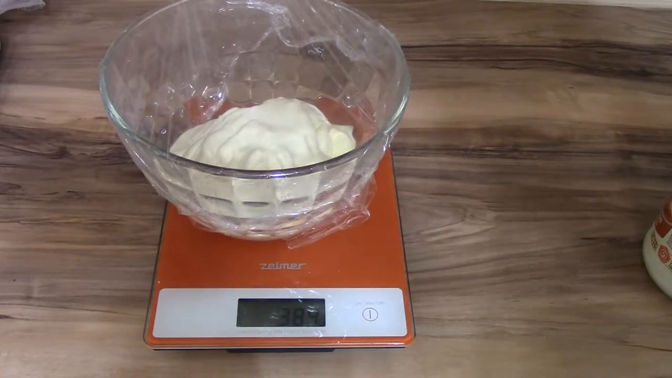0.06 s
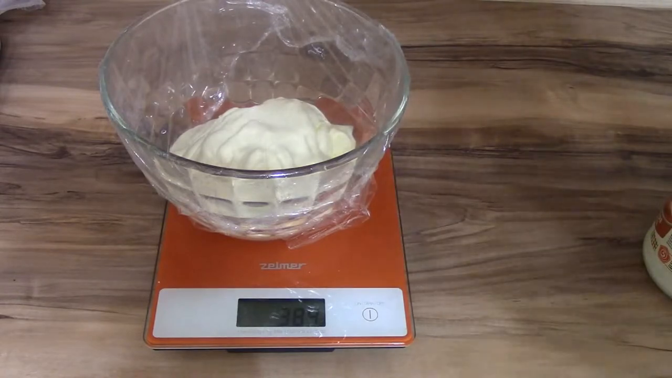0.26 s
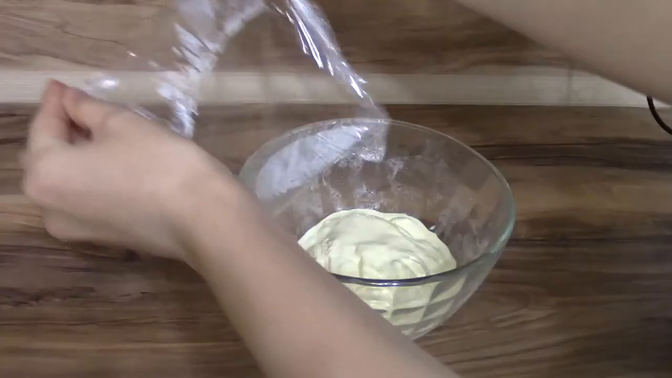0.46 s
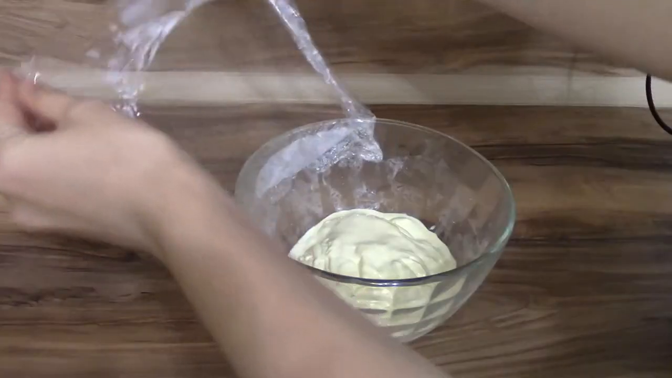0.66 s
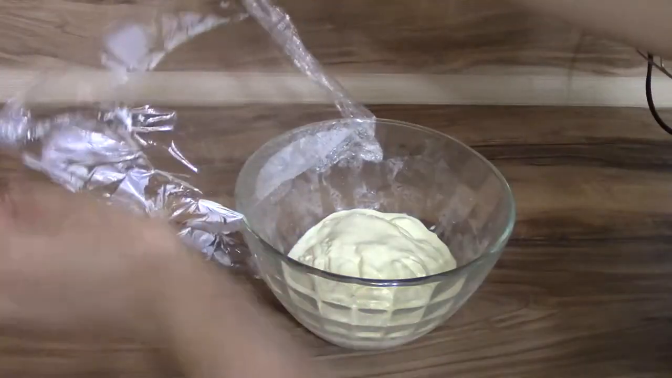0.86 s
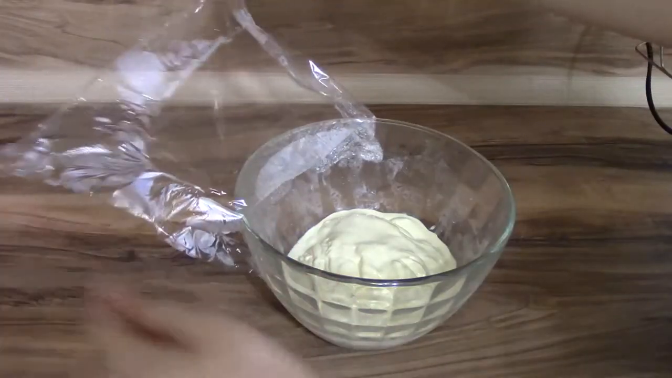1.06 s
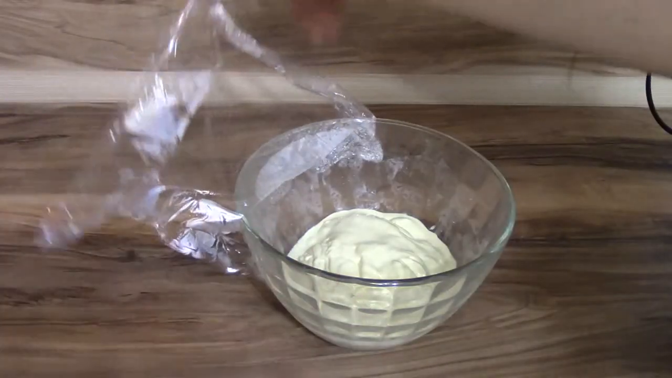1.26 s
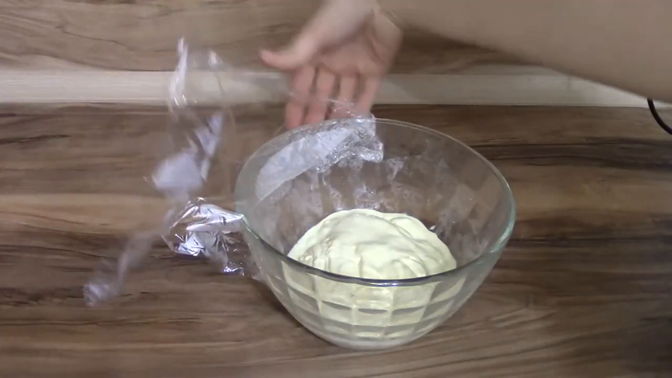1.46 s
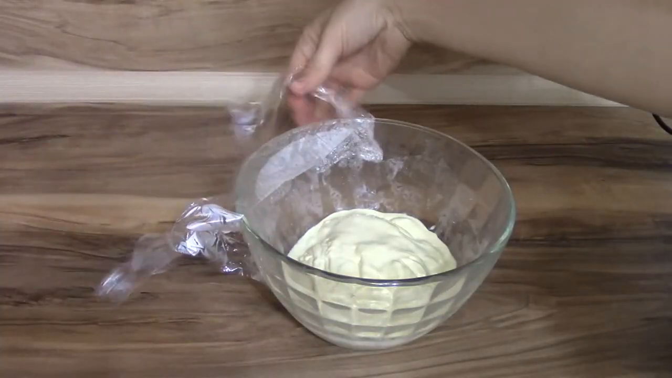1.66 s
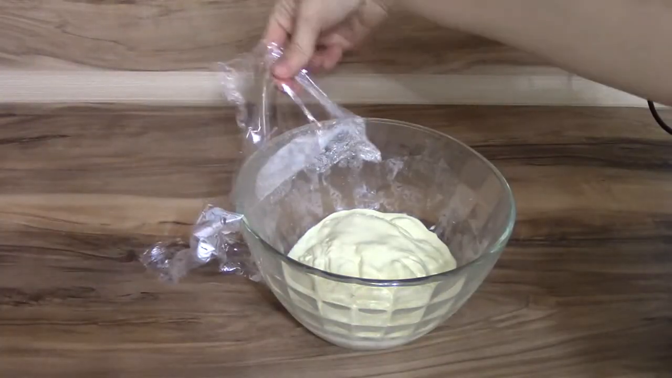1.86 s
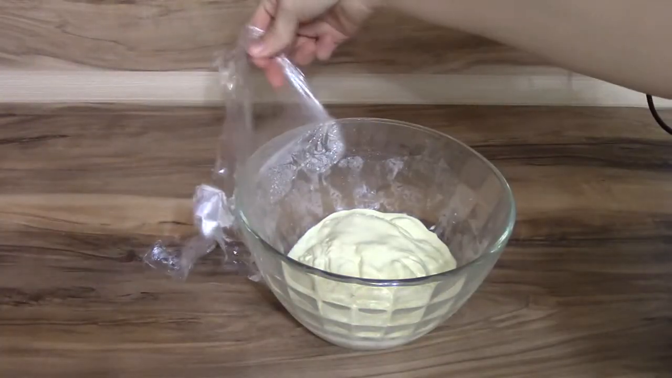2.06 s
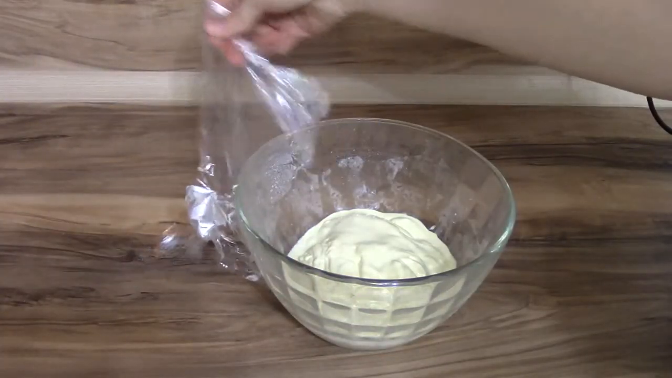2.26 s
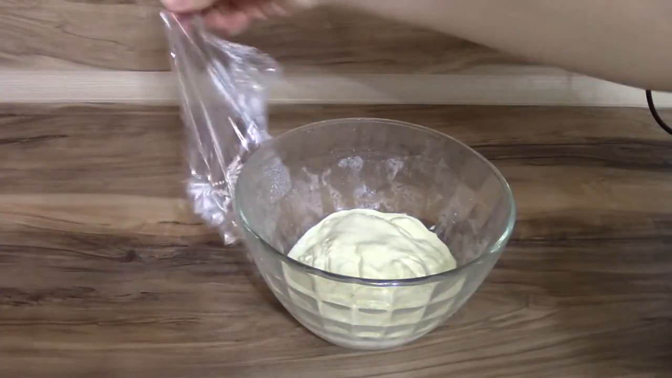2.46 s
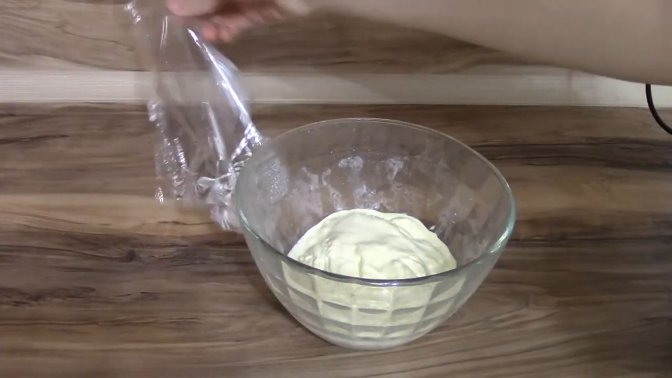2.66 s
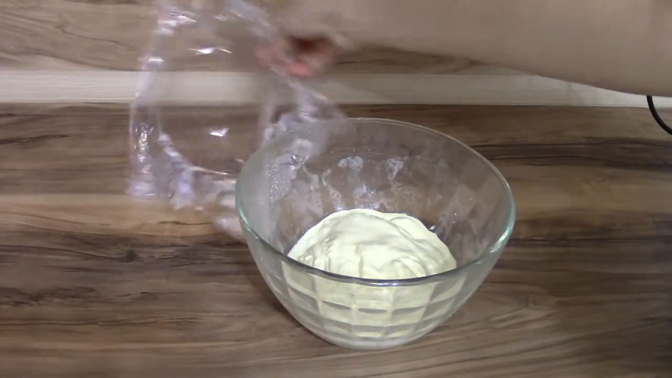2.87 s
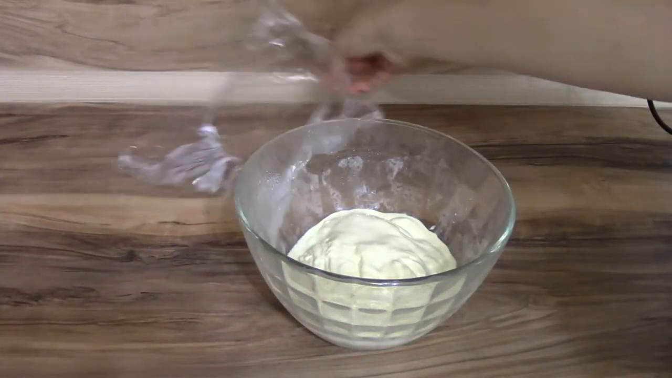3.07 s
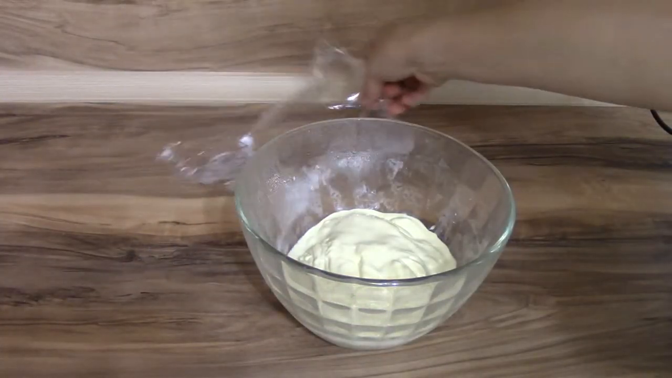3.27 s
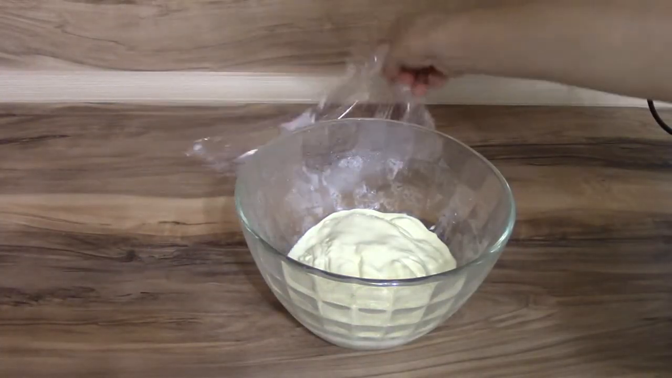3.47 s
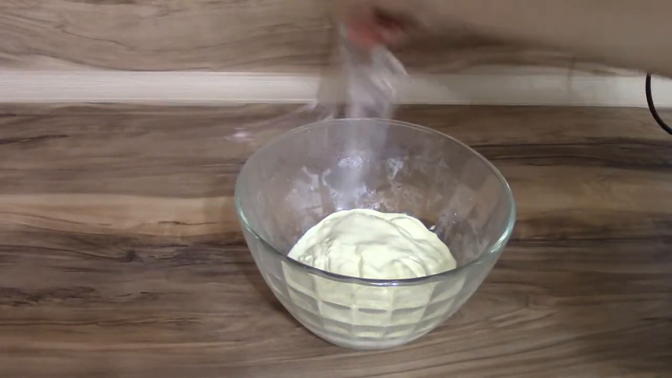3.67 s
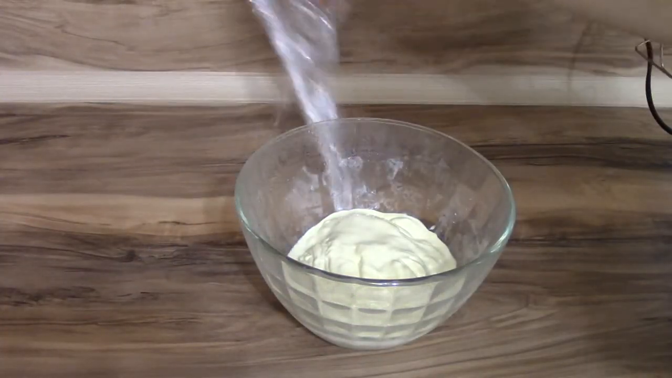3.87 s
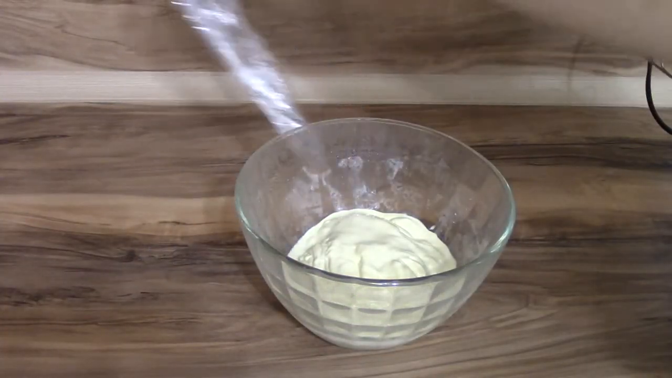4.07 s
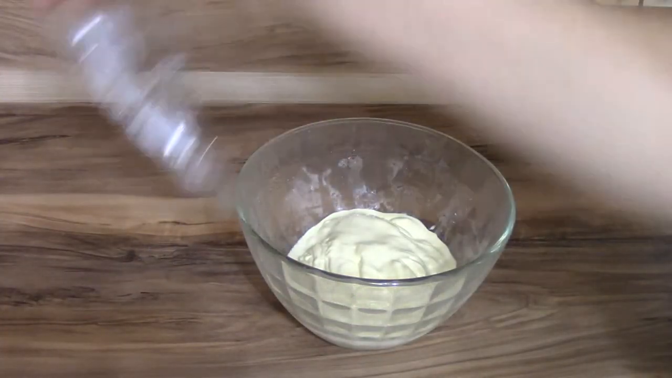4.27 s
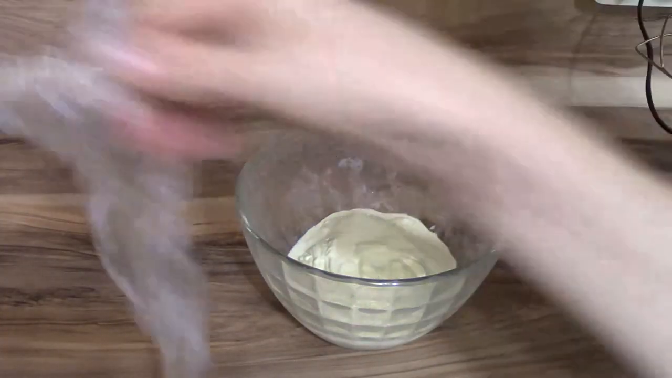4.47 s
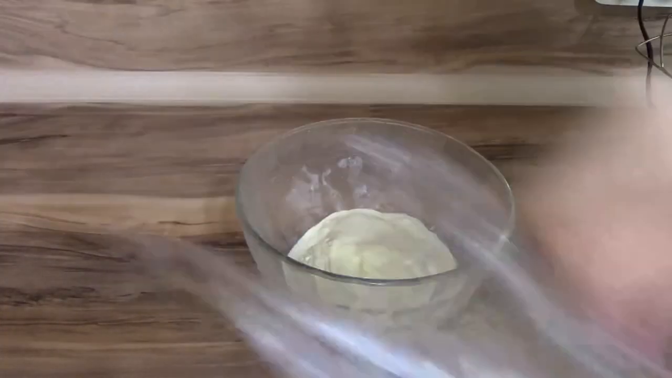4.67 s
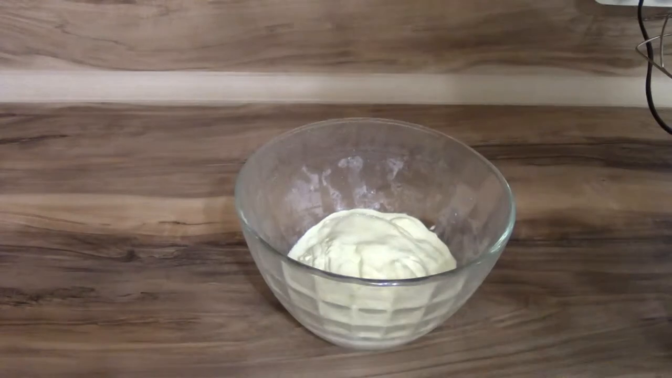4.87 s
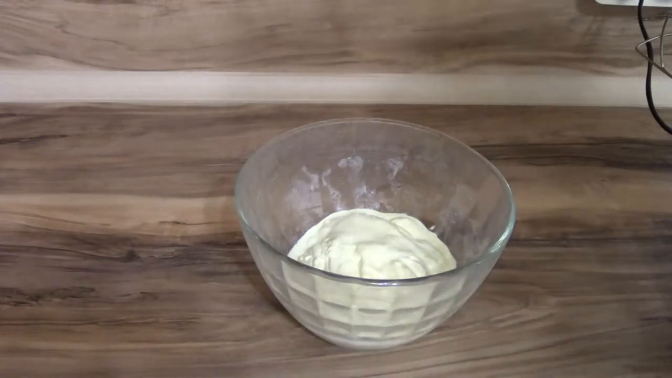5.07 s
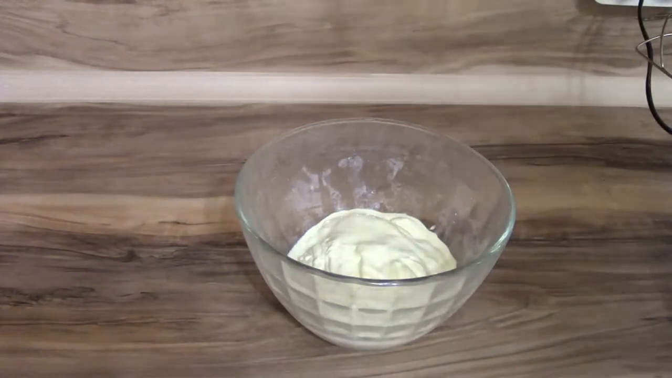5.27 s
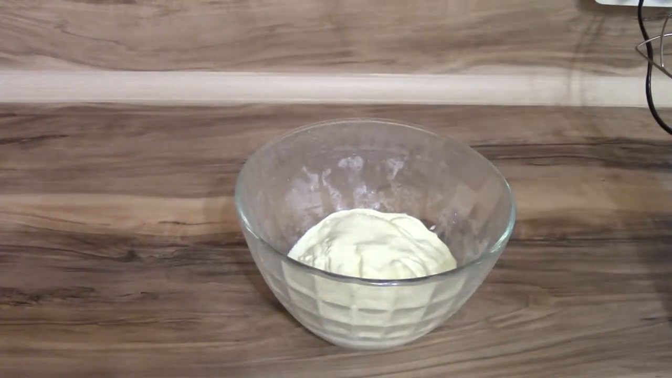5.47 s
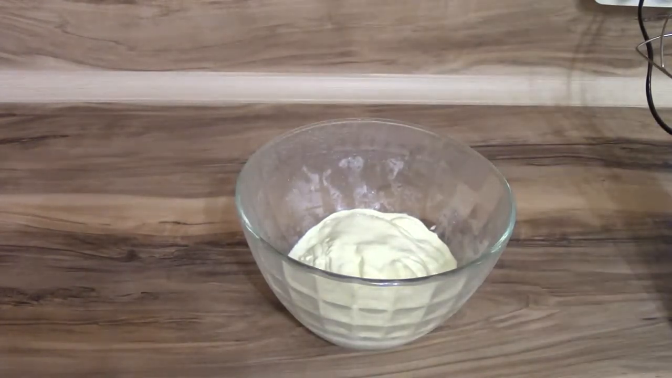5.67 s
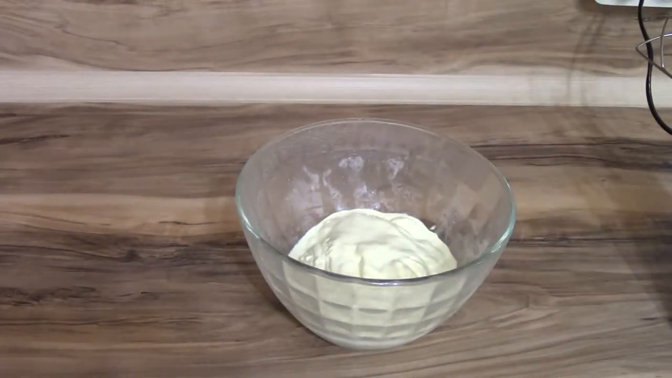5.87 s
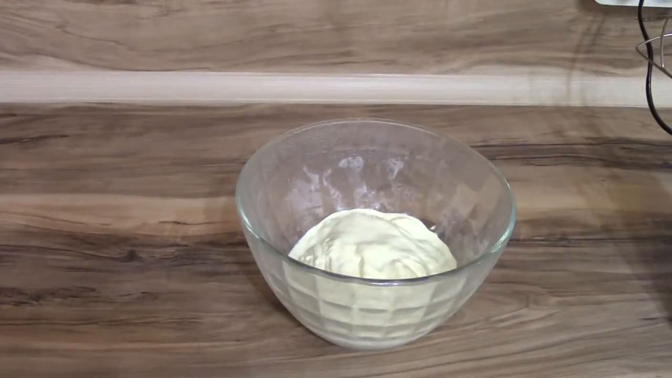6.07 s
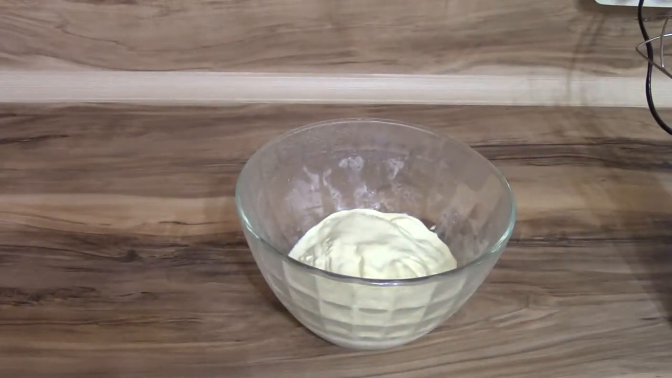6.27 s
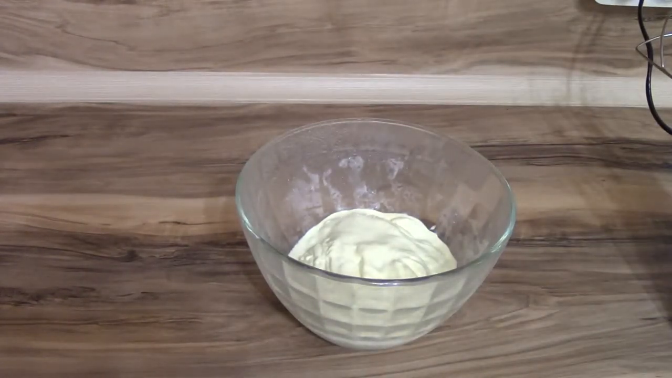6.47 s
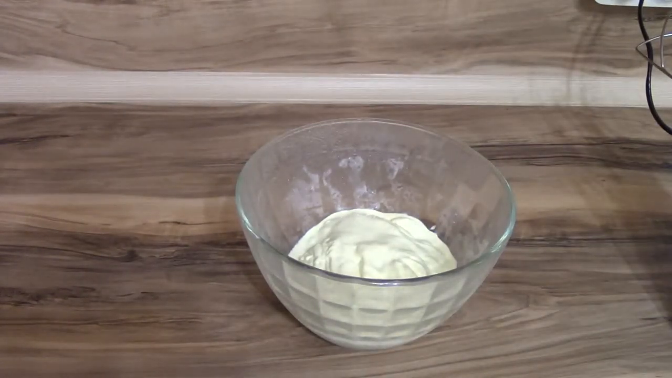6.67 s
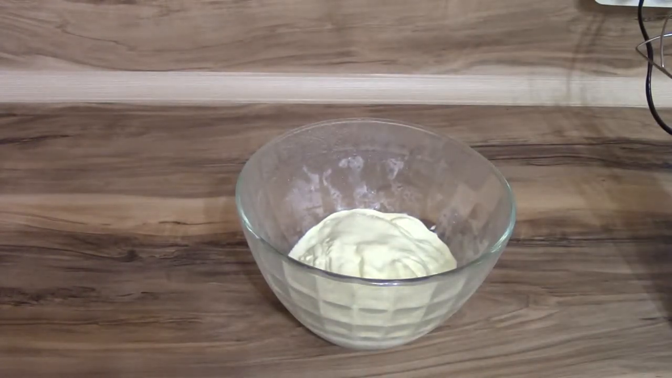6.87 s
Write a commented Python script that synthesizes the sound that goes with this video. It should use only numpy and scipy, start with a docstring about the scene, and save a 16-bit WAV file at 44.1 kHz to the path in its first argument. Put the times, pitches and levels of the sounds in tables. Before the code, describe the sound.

A faint, wavering appliance hum and soft room air fill a small kitchen, alone at first. At about 0.4 s, close, bright cling film crackle starts abruptly, with snaps and a tiny zipping rip near 0.6, fading into thin rustle by 1.2. A soft tap comes at 1.5; sharp pops at 1.8 to 2.0 open a fuller, looser rustle. Pulls swell around 2.5, and a hard snap with a low counter knock lands at 2.7. Crisp crinkling continues, with snaps, knocks and short bright rips around 3.3. Lighter swishes and ticks follow, clustered near 4.0. Two very short squeaks chirp at 4.6 and 4.7. From 4.95 to 5.4 the sheet crumples in short bursts, becoming duller as it goes behind the microphone. Faint knocks tap between 5.4 and 5.8, a small crinkle follows at 5.9, then mostly hum and faint stirring remain until 6.9.

```python
"""Cling film is peeled off a glass bowl on a kitchen counter, then carried away and crumpled.
Random ticks and tiny pings make the crackle; noise bursts make snaps as taut film lets go of the rim.
Rips, runs of pings, come early on and again midway. Soft knocks, ringing counter tones, come now and then.
Later the film squeaks twice in short gliding tones, its treble is shaded, and the loose sheet crumples.
Throughout, an appliance hums in sines over filtered noise for the air of the small room."""
import sys
import numpy as np
from scipy import signal
from scipy.fft import rfft, irfft
from scipy.io import wavfile

SR = 44100
rng = np.random.default_rng(int(sys.argv[2]) if len(sys.argv) > 2 else 0)


def transcribe(u):
    """Save the signal u as a 16-bit wav file named by the first command-line argument.

    u: samples, shape (n,) or (channels, n), limited to [-1, 1]; the rate is SR.
    q: integer samples, one column per channel.
    """
    v = np.clip(np.atleast_2d(u).T, -1, 1)
    q = np.round(v * 32767).astype(np.int16)
    wavfile.write(sys.argv[1], SR, q)


N = 305210
TIME = np.arange(N) / SR  # s

# How far the film is carried behind the microphone: t/s, shaded share/0-1
SHADE_CURVE = [(4.5, 0), (5.35, .4), (5.7, .9), (6.9, 0.84)]


def from_db(db):
    """Turn decibels into gain."""
    return 10 ** (np.asarray(db) / 20)


def rms_one(x):
    """Scale a sound to rms 1."""
    return x / np.sqrt(np.mean(x ** 2) + 1e-20)


def die_away(t, t60):
    """Fade steadily, by 60 dB in each t60."""
    return np.exp(-np.log(1000) * t / t60)


def in_time(rows):
    """Read each column of a time curve at every sample."""
    s, *columns = np.transpose(rows)
    return [np.interp(TIME, s, column) for column in columns]


def at_hz(points, hz):
    """Read a table on a log-frequency axis."""
    known, values = np.transpose(points)
    return np.interp(np.log(np.maximum(hz, 1)), np.log(known), values)


def add(track, s, sound):
    """Mix a short sound in at time s."""
    at = max(round(s * SR), 0)
    track[at:at + len(sound)] += sound[:N - at]


def drift(rate):
    """Wander at random with rms 1, in straight lines between `rate` points a second."""
    knots = rng.standard_normal(N // 8)
    return rms_one(np.interp(TIME * rate, np.arange(len(knots)), knots))


def cut(x, hz, kind, order=2):
    """Butterworth low-, high- or band-pass."""
    edge = np.minimum(hz, SR / 2 - 500)
    sos = signal.butter(order, edge, kind, fs=SR, output="sos")
    return signal.sosfilt(sos, x + 1e-18)


def colour(x, spectrum, size=2048):
    """Causal (minimum-phase) filter of unit energy that follows a spectrum."""
    level_db = at_hz(spectrum, np.linspace(0, SR / 2, size // 2 + 1))
    # folding the cepstrum forward packs the energy as early as possible
    cepstrum = irfft(np.log(from_db(level_db)))
    cepstrum[1:size // 2] *= 2
    cepstrum[size // 2 + 1:] = 0
    response = irfft(np.exp(rfft(cepstrum)))
    return signal.oaconvolve(x, response / np.linalg.norm(response))[:N]


def ring(clicks, hz, t60):
    """Like a struck object, a unit click starts a dying sine of height about 1."""
    r = from_db(-60 / (t60 * SR))
    w = 2 * np.pi * min(hz, SR / 2 - 500) / SR
    return signal.lfilter([0, np.sin(w)], [1, -2 * r * np.cos(w), r * r], clicks + 1e-18)


def crinkle(facet_db=0.0, split_hz=4500, clump_db=2.17, rub_db=-6.0, slack_db=-48.0, lone_db=-17.0,
            shade_hz=8000):
    """Dry ticks and ringing facets come in avalanches; the sheet as a whole gives the lower rustle."""
    # Colour of the film: f/Hz, relative level/dB
    film_colour = [(120, -27), (230, -14.5), (350, -3), (560, 1), (820, -0.5), (1050, -1), (1380, 3.5),
                   (2000, -3), (2500, 1), (3500, 0), (4600, -3.5), (6000, 1), (7800, -0.5), (9400, 2),
                   (12200, -0.5), (15500, -8.5)]
    crackle_db, rustle_db = handling()
    ticks = rms_one(buckles(per_s=4000, spread_db=3.0, clump_db=2.16))
    # slack film buckles seldom, so single ticks stand out when the crackle is below slack_db
    slack = .5 - .5 * np.tanh((crackle_db - slack_db) / 6)
    lone = from_db(lone_db) * slack * rms_one(buckles(per_s=90, spread_db=2.0, clump_db=-1.0))
    ping_gain = from_db(facet_db + clump_db * drift(140))
    pings = ping_gain * facets(per_s=3000, cycles=12.7, spread_db=3.0)
    crackle = cut(colour(ticks + pings + lone, film_colour), split_hz, "high", order=3)
    # shade dulls the crackle but leaves its overall strength
    shade = np.clip(in_time(SHADE_CURVE)[0], 0, 1)
    dull = rms_one(cut(crackle, shade_hz, "low", order=1)) * np.std(crackle)
    crackle = (1 - shade) * crackle + shade * dull
    rub = from_db(rub_db) * rng.standard_normal(N)
    rustle = cut(colour(ticks + .5 * lone + rub, film_colour), split_hz, "low", order=3)
    return from_db(crackle_db) * rms_one(crackle) + from_db(rustle_db) * rms_one(rustle)


def handling(taut_rustle_db=-5):
    """Taut and loose film add their powers: levels in dB of the fine crackle and the lower rustle."""
    # taut film is bright: its rustle lies below its crackle
    taut = pulling() * from_db([[0], [taut_rustle_db]])
    return 10 * np.log10(taut ** 2 + swinging())


def pulling(grip_s=0.011, release_t60=.09):
    """The hand peels taut film off the glass: each pull grips, tightens or slackens, and is released."""
    # Pulls: start t/s, end t/s, level at the start/dB, level at the end/dB
    pulls = [(.372, 0.554, -38.5, -38), (0.55, .6, -34.5, -35.5), (0.608, 0.724, -37.5, -35.5),
             (1.745, 1.84, -46, -44), (1.848, 2.007, -38, -37), (2.296, 2.48, -44, -35),
             (3.01, 3.065, -41, -43.5), (3.102, 3.19, -38.5, -36), (3.219, 3.275, -34, -37),
             (3.302, 3.336, -34.5, -35)]
    out = np.zeros(N)
    for start, end, first_db, last_db in pulls:
        # the grip grows just ahead of the start; the sound dies away when the hand eases
        grip = np.clip(1 + (TIME - start) / grip_s, 0, 1)
        release = die_away(np.clip(TIME - end, 0, 2 * release_t60), release_t60)
        strength = from_db(np.interp(TIME, [start, end], [first_db, last_db]))
        out = np.maximum(out, grip * release * strength)
    return out


def swinging(loose_rustle_db=-1.5, shaded_rustle_db=5.5):
    """The loose sheet swings or crumples: swishes of crackle and rustle power over a faint stir."""
    # The hanging sheet never lies quite still: t/s, crackle level/dB
    stir = [(.35, -82), (.4, -59), (1.5, -64.5), (2.0, -53), (3.5, -56.5), (4.4, -58), (5.5, -59),
            (6.1, -64), (6.9, -69)]
    # Swishes: peak t/s, crackle level/dB, time of a 20 dB rise/s, time of a 20 dB fall/s,
    # rustle against crackle/dB
    swishes = [(.74, -48, .05, .48, -5), (1.16, -57.5, .2, .33, -3), (1.17, -53, .02, .05, 5),
               (1.545, -54, .03, .08, 8.5), (1.98, -40.7, .38, .6, -.5), (2.3, -48, 0.27, 0.22, 1),
               (2.48, -40.5, 0.13, .14, 1), (2.555, -42.5, .15, .11, -5), (2.665, -44.5, .08, .17, -4),
               (2.735, -45.5, .03, .17, .5), (2.925, -40.5, .085, .3, -6.5), (3.03, -48, 0.067, 0.36, 2.5),
               (3.345, -45.5, .25, .22, -.5), (3.68, -49.5, .15, .27, -4), (4.0, -48.5, .22, .25, -6),
               (4.3, -55, .12, .1, -6), (4.65, -53, .25, .25, -7), (4.82, -52, .02, 0.18, -9),
               (4.953, -43.5, .015, .16, -1), (5.09, -51, .06, .1, 0), (5.255, -49, .2, .17, -1),
               (5.349, -45, .09, .11, -2.5), (5.943, -50, .015, .11, -6), (6.35, -59, .06, .08, -8)]
    crackle = from_db(in_time(stir)[0]) ** 2
    # hanging film sounds duller than taut film, and shade adds to its rustle
    rustle = crackle * from_db(loose_rustle_db + shaded_rustle_db * in_time(SHADE_CURVE)[0]) ** 2
    for s, level_db, rise, fall, rustle_db in swishes:
        away = np.clip(np.maximum((s - TIME) / rise, (TIME - s) / fall), 0, 10)
        swell = from_db(level_db - 20 * away) ** 2
        crackle = crackle + swell
        rustle = rustle + swell * from_db(rustle_db) ** 2
    return np.array([crackle, rustle])


def buckles(per_s, spread_db, clump_db):
    """Film buckles in random clicks, many small and a few large, whose strength swells in avalanches."""
    born = rng.random(N) < per_s / SR
    size_db = spread_db * np.minimum(rng.exponential(1, N), 4) + clump_db * drift(170)
    return born * from_db(size_db) * rng.choice([-1, 1], N)


def facets(per_s, cycles, spread_db, low_hz=4000, top_hz=14000, size=96):
    """Small facets flip over at random, each ringing for a few cycles at a pitch of its own."""
    at = np.flatnonzero(rng.random(N) < per_s / SR)
    pitch, strength = rng.random((len(at), 2)).T
    turns = np.outer(low_hz + (top_hz - low_hz) * pitch, np.arange(size)) / SR
    gain = from_db(spread_db * np.minimum(-np.log1p(-strength), 4))
    # 60 dB down after the given number of cycles
    pings = gain[:, None] * np.sin(2 * np.pi * turns) * die_away(turns, cycles)
    places = at[:, None] + np.arange(size)
    return rms_one(np.bincount(places.ravel(), pings.ravel(), N)[:N])


def snaps(crack=1.6, thump_hz=3000, size=4096):
    """A crease gives way with one crack and a quickly dying cascade; taut film adds a low thump."""
    # Creases that snap: t/s, level before colouring/dB, low thump against it/dB, t60/s
    creases = [(.375, -33, -6, .035), (.572, -26, -9, .009), (.6875, -25, -10, .03),
               (.7262, -29, -13, .016), (.851, -35, -14, .007), (1.8067, -26.5, 1, .01),
               (1.8445, -24, 2, .011), (1.854, -26.5, -1.5, .02), (1.931, -27.5, -10, .03),
               (1.9678, -18, 6, .011), (1.9992, -25.5, 2, .025), (2.341, -30.5, -4, .025),
               (2.483, -28.5, 4, .02), (2.562, -32, -9, .025), (2.719, -23, -6, .006),
               (2.7283, -17.5, -1.5, .012), (3.0032, -26.5, -4, .012), (3.1003, -24, -1.5, .014),
               (3.217, -30, -9, .015), (3.3061, -23, -3, .008), (3.3422, -24, 0, .011),
               (3.824, -38, -14, .009), (3.915, -35, -14, .006), (3.938, -36, -16, .013),
               (3.9865, -26, -13, .005), (3.994, -31.5, -12, .013), (4.11, -33, -18, .018),
               (4.5938, -33, -18, .025), (4.978, -37, 4, .03), (5.108, -39, 7, .007),
               (5.351, -38, -2, .015)]
    # Colour of a snap: f/Hz, relative level/dB
    snap_colour = [(100, -32), (230, -17), (400, -16), (540, -22), (760, 1), (1250, 3), (1800, 1),
                   (3000, 2.5), (4400, -1.5), (6000, -0.5), (9000, -0.5), (12500, -1.5), (15500, -12)]
    cracks, thumps = np.zeros(N), np.zeros(N)
    t = np.arange(size) / SR
    for s, level_db, thump_db, t60 in creases:
        cascade = rng.standard_normal(size) * die_away(t, t60)
        cascade[0] = crack
        add(cracks, s, from_db(level_db) * cascade)
        add(thumps, s, from_db(level_db + thump_db) * cascade)
    high = cut(cracks, thump_hz, "high", order=1)
    low = cut(thumps, thump_hz, "low", order=1)
    return colour(high + low, snap_colour)


def rips(cycles=27.0, unevenness=0.33, count=60):
    """Taut film unzips from the rim in a run of uneven slips, each a bright ping."""
    # Rips: start t/s, end t/s, typical slips per second, pitch f/Hz, rms level/dB
    runs = [(0.554, 0.598, 470, 9200, -37), (3.263, 3.298, 390, 7900, -37.5),
            (3.306, 3.335, 500, 10800, -29.5), (3.327, 3.346, 530, 12200, -30)]
    out = np.zeros(N)
    for start, end, per_s, hz, level_db in runs:
        slips = np.zeros(max(round((end - start) * SR), 1))
        gaps = np.exp(unevenness * rng.standard_normal(count)) / per_s
        at = (np.cumsum(gaps) * SR).astype(int)
        sizes = from_db(rng.normal(0, 4.2, count))
        inside = at < len(slips)
        slips[at[inside]] = sizes[inside]
        add(out, start, from_db(level_db) * rms_one(ring(slips, hz, cycles / hz)))
    return out


def squeaks(ring_db=-13.0, ring_t60=0.22, size=6615):
    """Fast stick-slip gives short gliding tones that beat together and leave the bowl ringing faintly."""
    # Tones of the sticking film: t/s, length/s, start f/Hz, end f/Hz, level before a 1 dB lift/dB
    tones = [(4.5914, 0.012, 1500, 1470, -34.5), (4.592, 0.011, 1770, 1810, -33),
             (4.595, 0.0085, 2800, 2770, -49), (4.7276, 0.013, 2780, 2680, -35.5),
             (4.728, 0.013, 3040, 3200, -45), (4.730, 0.011, 1850, 1850, -48)]
    out = np.zeros(N)
    t = np.arange(size) / SR
    for s, length, start_hz, end_hz, level_db in tones:
        phase = 2 * np.pi * np.cumsum(np.interp(t, [0, length], [start_hz, end_hz])) / SR
        grip = np.sqrt(np.maximum(np.sin(np.pi * np.minimum(t / length, 1)), 0))
        after = np.minimum(t / length, 1) * from_db(ring_db) * die_away(t, ring_t60)
        add(out, s, from_db(level_db + 1.0) * (grip + after) * np.sin(phase))
    return out


def reflections(x, near_db=-5.0, nearest_s=.001, farthest_s=.008, sway=0.253, count=6):
    """Quick echoes off bowl, counter and wall; their delays shift as the hand moves the film."""
    echoes = np.zeros(N)
    for k, delay in enumerate(np.geomspace(nearest_s, farthest_s, count)):
        shift = sway * np.sqrt(delay * nearest_s) * drift(4)
        echoes += (-1) ** k * np.interp(TIME - delay - shift, TIME, x)
    # divide so that the echoes add little to the overall level
    return (x + from_db(near_db) * echoes / np.sqrt(count)) / np.hypot(1, from_db(near_db))


def knocks(contact_s=0.00512, focus_db=12.5, uneven_db=1.8):
    """A soft, drawn-out contact rings those modes of the counter that lie near its centre pitch."""
    # Knocks as the bowl is tugged and things are touched: t/s, level/dB, centre f/Hz
    touches = [(.690, -36.5, 550), (1.546, -39.5, 1060), (1.855, -39, 800), (2.483, -36, 477),
               (2.7273, -29, 397), (3.306, -34.5, 420), (3.324, -35, 500), (3.342, -35, 456),
               (3.55, -45.5, 990), (3.748, -45, 595), (4.595, -46, 784), (5.431, -47, 1110),
               (5.543, -45, 845), (5.693, -45, 720), (5.83, -46.5, 950)]
    # Ringing modes of the counter top: f/Hz, relative level/dB, t60/s
    modes = [(320, -11, .04), (420, -2, 0.033), (539, -2.5, 0.043), (650, -5, 0.033), (783, -6, 0.057),
             (934, -2.5, 0.049), (1070, 0.5, 0.041), (1370, 2, 0.033), (1920, 0, .025)]
    out = np.zeros(N)
    for k, (hz, mode_db, t60) in enumerate(modes):
        push = np.zeros(N)
        for s, level_db, centre_hz in touches:
            # a mode is weaker the more octaves it lies from the centre pitch
            off_centre_db = focus_db * np.log2(hz / centre_hz) ** 2
            strength_db = level_db + mode_db - off_centre_db + uneven_db * rng.standard_normal()
            # each mode starts at its own moment within the contact
            add(push, s + contact_s * rng.random(), from_db([strength_db]) * (-1) ** k)
        out += ring(push, hz, t60)
    return out


def background(waver_db=1.5, wander=0.62, hiss_hz=3100, hiss_t60=0.0023):
    """A wavering mains hum of sines over dull room air and a faint, narrow hiss of ringing noise."""
    # Appliance, mains harmonics and fan tones: f/Hz, peak level before waver and curve/dB
    hum_tones = [(148.5, -87), (198, -81), (247, -74), (296.1, -68), (328, -78), (345.6, -58.5),
                 (395.2, -66.5), (444.8, -64), (506, -69.5), (541, -76), (592.8, -66.5)]
    # Colour of the room air: f/Hz, relative level/dB
    air_colour = [(25, -18.5), (100, -19), (135, -19.5), (165, -10), (230, -11), (320, -1.5), (600, -1.5),
                  (850, -2), (1200, -4), (1800, -6), (2300, -9), (3200, -10.5), (4500, -13), (15500, -28)]
    # Slow level curves: t/s, hum change/dB, air level/dB, faint hiss level/dB
    level_curves = [(0, 1.5, -54.5, -69), (0.35, 2, -57, -70), (0.39, 0, -56, -57), (2.0, 1, -55.5, -59),
                    (4.1, 0.5, -56.5, -59.5), (4.6, -1.5, -55, -59.5), (6.9, -2, -55.5, -58.5)]
    hum_db, air_db, hiss_db = in_time(level_curves)
    hum = np.zeros(N)
    for hz, level_db in hum_tones:
        gain = from_db(level_db + waver_db * drift(7))
        hum += gain * np.sin(2 * np.pi * hz * TIME + wander * drift(9))  # wander in radians
    air = colour(rng.standard_normal(N), air_colour)
    hiss = rms_one(cut(ring(rng.standard_normal(N), hiss_hz, hiss_t60), 1350, "high"))
    return from_db(hum_db) * hum + from_db(air_db) * air + from_db(hiss_db) * hiss


def kitchen(x, room_db=-11.0, size=22050, count=8):
    """Walls add to the direct sound a diffuse tail of noise bands that dies sooner in the treble."""
    # Decay of the kitchen: f/Hz, t60/s
    decay = [(200, 0.34), (1500, 0.3), (6000, 0.23), (14000, 0.15)]
    t = np.arange(size) / SR
    edges = np.geomspace(100, 18000, count + 1)
    tail = np.zeros(size)
    for low, high in zip(edges, edges[1:]):
        band = cut(rng.standard_normal(size), [low, high], "band")
        tail += band * die_away(t, at_hz(decay, np.sqrt(low * high)))
    tail *= t > .004  # a short gap after the direct sound
    response = from_db(room_db) * tail / np.linalg.norm(tail)
    response[0] = 1
    return signal.oaconvolve(x, response / np.linalg.norm(response))[:N]


def scene(bass_hz=190, knock_bass_hz=280):
    """Film and knocks, without their lowest bass, sound in the kitchen over its background."""
    bright_rips = cut(rips(), 2700, "high")
    film = reflections(crinkle() + snaps() + bright_rips) + squeaks()
    near = cut(film, bass_hz, "high", order=3) + cut(knocks(), knock_bass_hz, "high", order=3)
    return (kitchen(near) + background())[None]


def record(dry, cutoff_hz=15900):
    """A steep elliptic low-pass takes away the top of the treble."""
    return signal.sosfilt(signal.ellip(12, .1, 80, cutoff_hz, fs=SR, output="sos"), dry)


dry = scene()
out = record(dry)
transcribe(out)
```